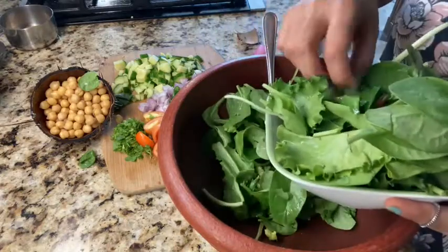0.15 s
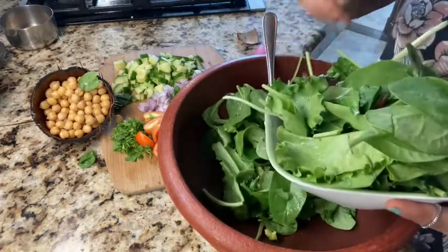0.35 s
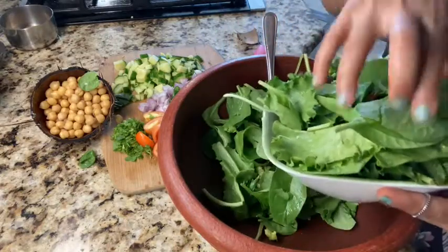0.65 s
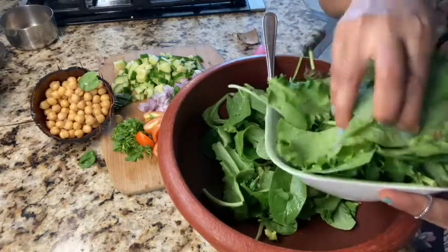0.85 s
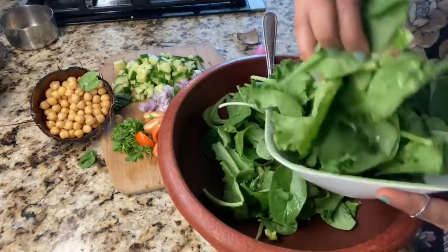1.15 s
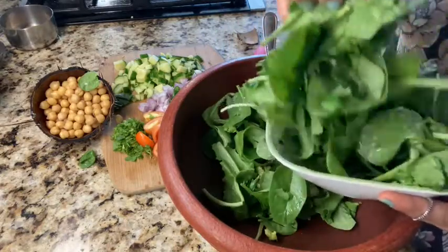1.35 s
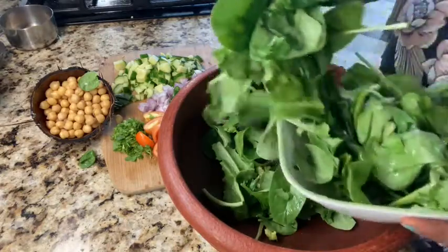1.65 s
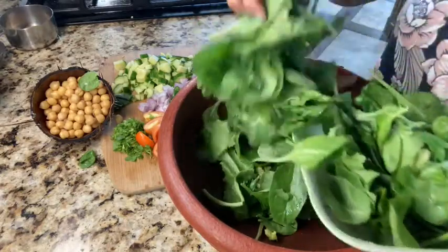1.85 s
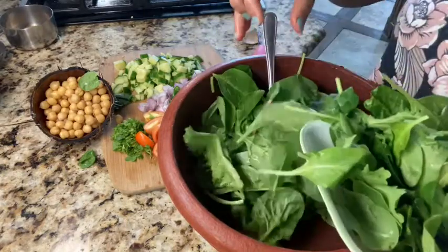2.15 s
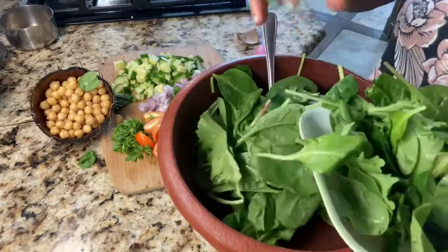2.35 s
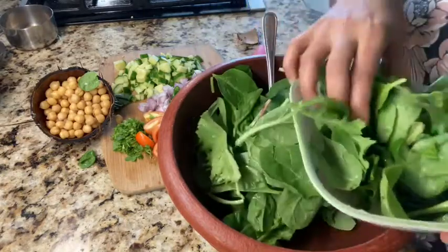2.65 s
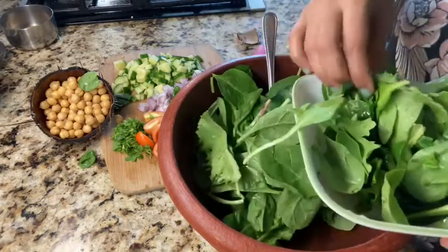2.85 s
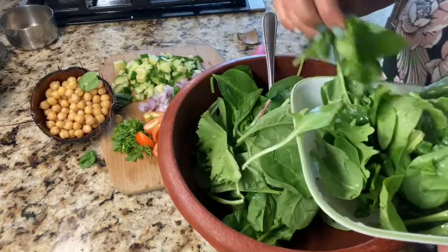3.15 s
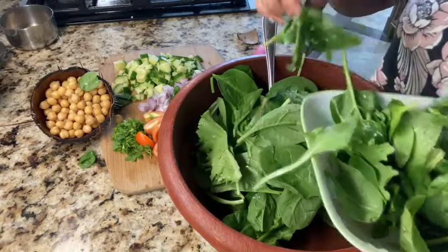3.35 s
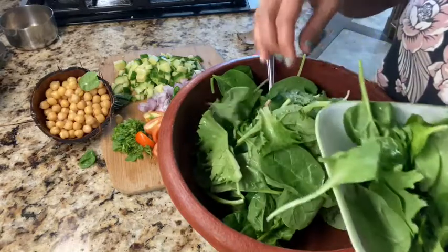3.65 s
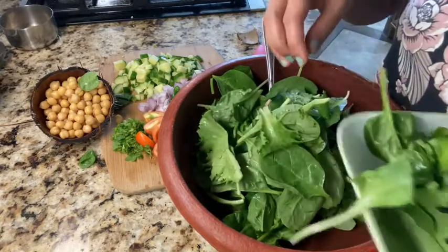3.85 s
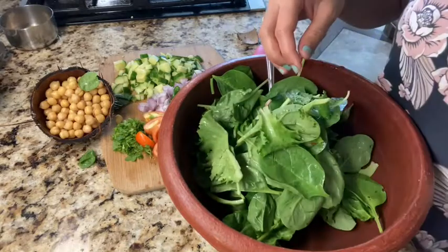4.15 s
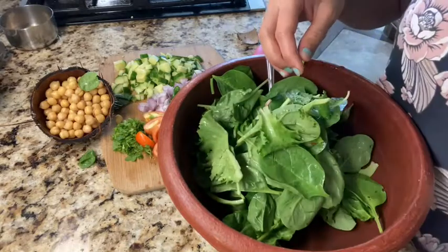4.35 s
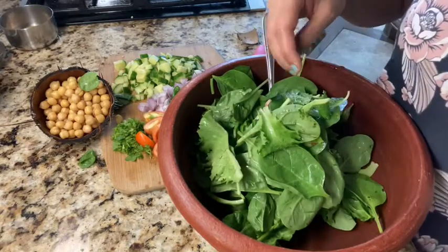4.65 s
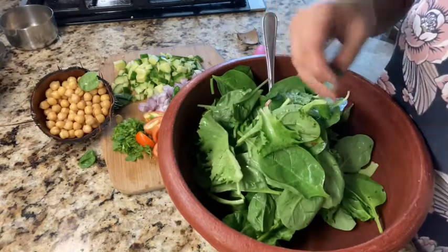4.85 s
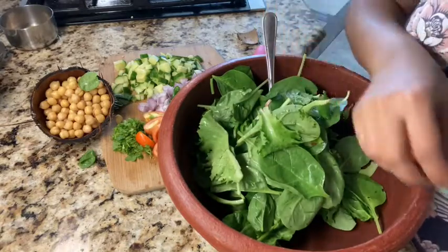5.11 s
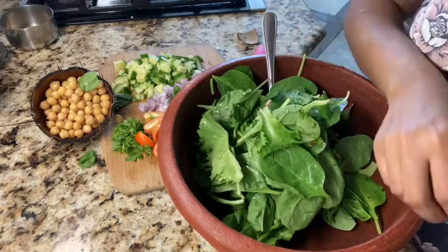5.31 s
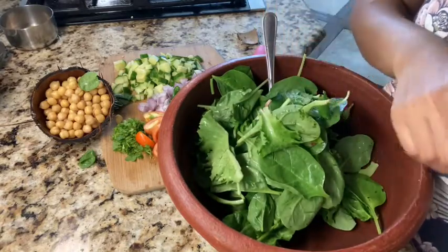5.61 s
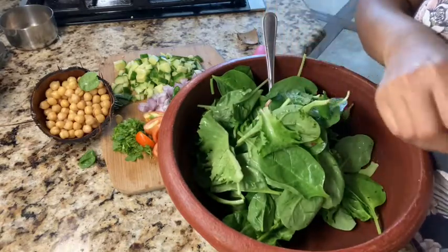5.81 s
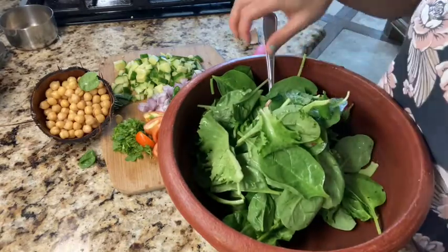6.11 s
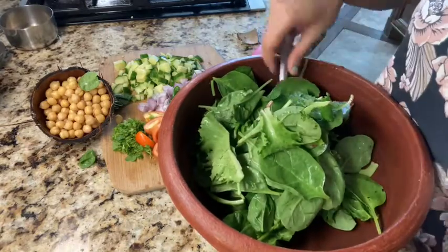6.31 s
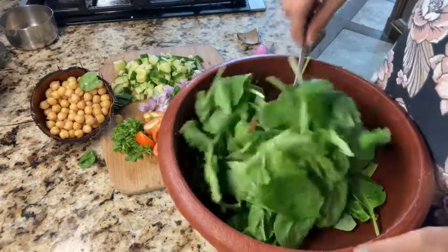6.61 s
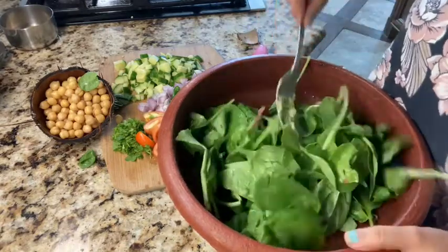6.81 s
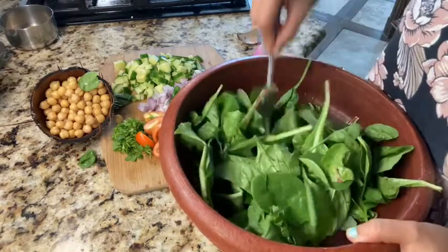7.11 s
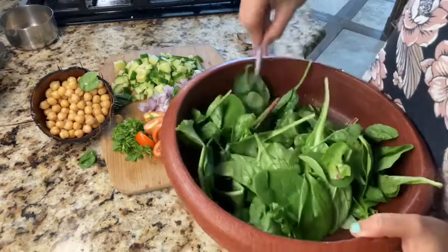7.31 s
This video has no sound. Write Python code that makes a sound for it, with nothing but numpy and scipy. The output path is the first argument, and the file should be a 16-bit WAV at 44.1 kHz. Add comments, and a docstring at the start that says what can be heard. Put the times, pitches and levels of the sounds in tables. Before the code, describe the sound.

Wet salad leaves rustle and snap into a clay bowl, a dish clanks hard onto stone, then a fork tosses the leaves over a low appliance hum.

```python
"""A kitchen appliance hums on air noise throughout while wet salad leaves, lifted from a glazed dish and dropped
into a clay bowl, brush, crinkle, fizz and snap as clumped grains and short noise bursts.
Then the dish is set down on a stone counter, bounces and settles: ringing modes, thuds, a dense noisy tail.
Last a fork slides along the clay rim and knocks it, tosses the leaves and scrapes the clay."""
import sys
import numpy as np
from scipy import signal
from scipy.fft import rfft, irfft, next_fast_len
from scipy.io import wavfile

SR = 44100
rng = np.random.default_rng(int(sys.argv[2]) if len(sys.argv) > 2 else 0)


def attenuation_scalar(level_db):
    """Turn a level in dB into a linear amplitude multiplier (20 dB per decade)."""
    decades = np.asarray(level_db, float) / 20
    return 10 ** decades


def persist_wave(psi):
    """Save psi, clipped to +-1, as 16-bit WAV."""
    counts = np.round(np.clip(psi, -1, 1) * 32767).astype(np.int16)
    wavfile.write(sys.argv[1], SR, np.atleast_2d(counts).T)


N = 329427   # length in samples


def rms_one(x):
    """Scale to unit rms."""
    return x / np.sqrt(np.mean(x ** 2) + 1e-20)


def since(s):
    """Seconds after a moment (zero before it) and seconds before it (zero after it)."""
    t = np.arange(N) / SR - s
    return np.maximum(t, 0), np.maximum(-t, 0)


def at_hz(points, hz):
    """Read a curve of (Hz, value) points on a log-frequency axis."""
    points = np.array(points)
    return np.interp(np.log(hz), np.log(points[:, 0] + 1), points[:, 1])


def drift(rate_hz):
    """Slow chance with a spread of about 1: noise through two equal low-pass poles, one value per 40 samples."""
    r = np.exp(-80 * np.pi * rate_hz / SR)
    slow = signal.lfilter([1], [1, -2 * r, r * r], rng.standard_normal(N // 40 + 2002))
    slow = slow[2000:]   # drop the filter's start-up
    return np.interp(np.arange(N) / 40, np.arange(len(slow)), rms_one(slow))


def ring(clicks, hz, t60):
    """A decaying mode: a unit click sets a sine of height about 1 ringing, 60 dB down after t60 seconds."""
    r = attenuation_scalar(-60 / (t60 * SR))
    w = 2 * np.pi * hz / SR
    return signal.lfilter([0, np.sin(w)], [1, -2 * r * np.cos(w), r * r], clicks + 1e-18)


def resonate(x, hz, width_hz):
    """One resonance, gain about 1 on top."""
    r = np.exp(-np.pi * width_hz / SR)
    poles = [1, -2 * r * np.cos(2 * np.pi * hz / SR), r * r]
    return signal.lfilter([(1 - r * r) / 2, 0, (r * r - 1) / 2], poles, x)


def grains(per_s, spread_db, clump_db, count):
    """Random clicks of uneven size and either sign that come in clumps."""
    born = rng.random((count, N)) < per_s * attenuation_scalar(clump_db * drift(25)) / SR
    sizes = attenuation_scalar(spread_db * np.minimum(rng.exponential(1, (count, N)), 5))
    return born * sizes * rng.choice([-1, 1], (count, N))


def coloured(source, spectrum, patchy_db, likeness):
    """Third-octave bands of four raw tracks, each with its own level, flicker, likeness and lean; rms 1."""
    # Stereo lean of each region. Each row: frequency in Hz, left over right in dB.
    lean_curve = [(60, 2), (110, 8.5), (200, -1), (380, 2.5), (700, -0.5), (1290, -4.5), (2380, -3.5),
                  (4400, -3.5), (8120, 0), (15000, 0)]
    lowest, highest = spectrum[0][0], spectrum[-1][0]
    edges = np.geomspace(lowest, highest, int(3 * np.log2(highest / lowest)) + 2)
    out = 0
    for k, (low, high) in enumerate(zip(edges, edges[1:])):
        band = signal.butter(2, [low, high], "band", fs=SR, output="sos")
        mid, side = signal.sosfilt(band, source[k % 2::2])   # neighbouring bands use different tracks
        hz = np.sqrt(low * high)
        alike = np.clip(at_hz(likeness, hz), -1, 1)
        lean = attenuation_scalar(at_hz(lean_curve, hz) / 2 * np.array([[1], [-1]]))
        gain = attenuation_scalar(at_hz(spectrum, hz) + patchy_db * drift(29))
        stereo = np.sqrt(1 + alike) * mid + np.sqrt(1 - alike) * side * [[1], [-1]]
        out = out + gain * lean * stereo
    return rms_one(np.array([np.roll(out[0], 8), out[1]]))   # the left port is farther


def air():
    """Background air: steady noise in bands that flicker a little, more alike left and right in the bass."""
    # Tone of the air. Each row: frequency in Hz, relative level in dB per Hz.
    air_spectrum = [(35, -13.5), (50, -15), (75, -13), (110, -10.5), (150, -16), (241, -16.5), (305, -24.5),
                    (490, -27), (690, -34), (850, -54), (1330, -49), (3630, -57), (9000, -55.5),
                    (16000, -56)]
    # Stereo width of the air. Each row: frequency in Hz, left-right likeness (1 is mono).
    air_likeness = [(35, 0.85), (60, 0.36), (130, 0.81), (290, 0.14), (640, 0.087), (15000, .05)]
    return attenuation_scalar(-55) * coloured(rng.standard_normal((4, N)), air_spectrum, patchy_db=3.0, likeness=air_likeness)


def drone():
    """Appliance hum: steady tones plus noise twice through narrow resonances, stronger and later on the left."""
    # Hum partials. Each row: frequency in Hz, width in Hz, wavering level in dB, steady level in dB.
    partials = [(122.2, 16, -57.5, -48.5), (97.3, 13, -68.5, -65), (49.7, 6.7, -76.5, -67.5)]
    out, t = 0, np.arange(N) / SR
    for hz, width_hz, waver_db, steady_db in partials:
        noise = rng.standard_normal(N + SR)
        narrow = resonate(resonate(noise, hz, width_hz), hz, width_hz)
        waver = rms_one(narrow[SR:])   # drop the filter's start-up
        steady = np.sin(2 * np.pi * hz * t + 1.38 * drift(0.45))   # the phase wanders slowly
        out = out + attenuation_scalar(waver_db) * waver + attenuation_scalar(steady_db) * steady
    return np.array([attenuation_scalar(3.0) * np.roll(out, 10), attenuation_scalar(-3.5) * out])


def kitchen(x):
    """Room sound: eight feedback delays a side, duller on every round because treble decays faster."""
    t60_s, wall_cut_hz = 0.88, 3200
    size = next_fast_len(N + SR)
    w = 2 * np.pi * np.arange(size // 2 + 1) / size
    t60 = t60_s / np.sqrt(1 + (w * SR / (2 * np.pi * wall_cut_hz)) ** 2)
    answer = np.zeros((2, len(w)), complex)
    lags = (rng.uniform(.021, .055, 16) * SR).astype(int)   # loop delays of 21 to 55 ms
    for k, lag in enumerate(lags):
        loop = attenuation_scalar(-60 * lag / SR / t60) * np.exp(-1j * w * lag)
        answer[k % 2] += (-1) ** (k // 2) * loop / (1 - loop)
    return irfft(answer * rfft(x, size), size)[:, :N]


def fork():
    """Tines catch on rough clay many times a second; a short slide ends in one knock on the rim."""
    # Clay wall resonances. Each row: frequency in Hz, width in Hz, level in dB.
    clay_modes = [(1130, 100, -3.5), (1440, 140, 0), (1850, 156, 5), (2492, 146, 4), (3800, 490, -20),
                  (5220, 400, -14), (6640, 400, -14), (7930, 420, -15.5), (12700, 2200, -14.5)]
    # Ringing of fork and rim. Each row: frequency in Hz, level in dB, t60 in seconds.
    knock_modes = [(390, -0.5, 0.024), (740, -14, 0.057), (1000, 0, 0.03), (1350, 5.5, 0.019),
                   (1540, -5.5, 0.03), (1985, -0.5, 0.08), (2710, -8.5, 0.052), (3715, -12.5, 0.04),
                   (5270, -11, .012)]
    # Scrapes on the clay. Each row: moment of full pressure in seconds, level in dB, hold in seconds.
    scrape_table = [(7.402, -35.5, 0.009), (7.43, -36, .04)]
    bite_db_per_s, slip_db_per_s = 3000, 500
    slide_s, slide_db, build_db_per_s, fade_db_per_s = 6.207, -68, 253.5, 899
    knock_s, knock_db = 6.239, -38.5

    catch = grains(3800, spread_db=3.0, clump_db=1.5, count=2)
    catch[0] = 1.1 * catch[0] + 0.47 * np.roll(catch[1], 45)   # the left port is farther
    wall = 0
    for k, (hz, width_hz, db) in enumerate(clay_modes):
        wall = wall + attenuation_scalar(db) * resonate(catch, hz, width_hz) * (-1) ** k
    wall = rms_one(wall)

    after, before = since(knock_s)
    slide = attenuation_scalar(np.maximum(slide_db - build_db_per_s * before - fade_db_per_s * after, -200))
    touch = slide * (since(slide_s)[0] > 0) * rms_one(catch[1])
    touch[round(knock_s * SR)] += attenuation_scalar(knock_db)
    knock = sum(attenuation_scalar(db) * ring(touch, hz, t60) for hz, db, t60 in knock_modes)

    press = np.zeros(N)
    for s, db, hold in scrape_table:
        before_bite, after_hold = since(s)[1], since(s + hold)[0]
        press += attenuation_scalar(db - bite_db_per_s * before_bite - slip_db_per_s * after_hold)
    scrape = attenuation_scalar([[-1.5], [2.5]]) * press * wall
    return scrape + [attenuation_scalar(-2.5) * np.roll(knock, 12), attenuation_scalar(3.5) * knock]


def noisy_tail():
    """A dense noisy tail of the blows: it starts abruptly, sags slowly, then dies faster and dulls.
    Returns its level in dB, its treble tilt in dB per octave and its two-port noise."""
    start_s, start_db, rise_db_per_s, sag_db_per_s = 4.618, -35.5, 1299, 20.5
    fade_s, fade_db_per_s, dulls_db_per_s = 5.215, 87, 12
    sagging, nearing = since(start_s)
    fading = since(fade_s)[0]
    level_db = start_db - rise_db_per_s * nearing - sag_db_per_s * sagging - fade_db_per_s * fading
    tilt_db = -0.5 - dulls_db_per_s * np.minimum(fading, .5)
    noise = rms_one(grains(9000, spread_db=5.0, clump_db=1.5, count=2))
    noise[0] = rms_one(.7 * noise[0] + np.roll(noise[1], 25))   # the ports hear much of the same noise
    return np.maximum(level_db, -200), tilt_db, noise


def dish():
    """Blows ring single modes, shake dense clusters and thud the slab; a noisy tail runs through both."""
    # Blows of dish on stone. Each row: start in seconds, strength in dB, hardness (treble tilt) in dB,
    # thud strength in dB.
    blow_table = [(4.6218, -5.5, 2.5, -25), (4.635, -20, -6, -33.5), (4.7741, -4.5, 3, -30.5),
                  (4.7936, -8.5, 3, -26), (4.803, -16.5, -3.5, -36), (4.819, -21.5, -5.5, -42),
                  (5.0662, -39, 16, -45), (5.0765, -32.5, -7.5, -47), (5.1157, -13, 1, -41),
                  (5.127, -16.5, -7, -31)]
    # Single dish modes. Each row: frequency in Hz, left level in dB, right level in dB, t60 in seconds,
    # lag of the farther left port in ms.
    dish_modes = [(394, -15.5, -16, 0.066, 0.43), (630, -15.5, -15, 0.042, 0.43),
                  (887, -27, -22.5, 0.33, 1.9), (972, -16, -7, 0.043, 1.2), (1106, -6, -7, 0.091, 0.97),
                  (1218, -9, -10, .06, 1.1), (1390, -12, -11, 0.065, 0.91), (1470, -17, -21, 0.035, 0.83),
                  (1515, -13.5, -7.5, 0.045, 0.79), (1730, -19, -11, .06, 0.84),
                  (1736, -16.5, -5, 0.082, 1.2), (1740, -31.5, -26.5, 0.72, 0.74),
                  (2342, -16, -19.5, 0.11, .8), (2703, -7.5, -3, 0.035, .8),
                  (2820, -24.5, -21.5, 0.26, 0.88), (3335, -24, -28.5, 0.03, .7),
                  (4460, -24.5, -16, 0.032, 1.8), (5080, -29, -23, 0.13, 1.1),
                  (4570, -18, -11.5, 0.016, 0.42), (5900, -27, -25, .015, .5),
                  (7560, -27.5, -25.5, 0.018, 0.32), (9660, -30, -25.5, 0.036, .3)]
    # Clusters of short modes, too dense to tell apart. Each row: frequency in Hz, width in Hz, level in dB.
    glaze_clusters = [(420, 140, -17), (580, 310, -5.5), (930, 200, 2.5), (1173, 500, 0.5),
                      (1478, 520, -5.5), (1806, 150, -3.5), (2020, 300, -6), (2540, 170, -3),
                      (2812, 300, -6.5), (4380, 350, -6), (4786, 330, -4), (5530, 490, -19),
                      (7780, 970, -16), (8770, 430, -24.5), (9640, 990, -19.5), (13000, 2700, -35.5)]
    # Stone slab under the dish. Each row: frequency in Hz, level in dB, t60 in seconds.
    slab_modes = [(67.8, -10, .15), (111.2, -10, 0.36), (167.4, 1, 0.088), (216, -7, 0.099)]

    s, peak_db, hard_db, thud_db = np.transpose(blow_table)
    at = np.round(s * SR).astype(int)
    chance_db = rng.normal(0, 1.0, (len(at), len(dish_modes)))   # no two blows excite the modes alike
    tail_db, tail_tilt_db, tail_noise = noisy_tail()
    out = np.zeros((2, N))
    for k, (hz, left_db, right_db, t60, lag_ms) in enumerate(dish_modes):
        clicks = attenuation_scalar(tail_db - 22.5) * tail_noise[1]
        clicks[at] += (-1) ** k * attenuation_scalar(peak_db + hard_db * np.log2(hz / 1500) / 2 + chance_db[:, k])
        sound = ring(clicks, hz, t60)
        late = np.roll(sound, round(lag_ms * SR / 1000))
        out += [attenuation_scalar(left_db) * late, attenuation_scalar(right_db) * sound]

    for hz, width_hz, db in glaze_clusters:
        octaves = np.log2(hz / 1500)
        blows = np.zeros(N)
        blows[at] = attenuation_scalar(peak_db - 11 + (hard_db + 0.5) * octaves)   # hard blows favour the high clusters
        shake = signal.lfilter([1], [1, -attenuation_scalar(-60 / (0.049 * SR))], blows + 1e-18)   # t60 0.049 s
        cluster = (attenuation_scalar(tail_db + tail_tilt_db * octaves) + shake) * tail_noise
        for _ in range(3):   # steep skirts
            cluster = resonate(cluster, hz, 1.2 * width_hz)
        out += attenuation_scalar(db + 14.5) * cluster

    thuds = np.zeros(N)
    thuds[at] = attenuation_scalar(thud_db)
    slab = sum(attenuation_scalar(db) * ring(thuds, hz, t60) for hz, db, t60 in slab_modes)
    return out + attenuation_scalar([[2.5], [-2.5]]) * slab


def snaps():
    """Each snap is a burst of noise a few ms long, coloured round its pitch; high ones crack wider."""
    # Stems and leaf ribs snapping, one small tick near the dish. Each row: start in seconds,
    # relative peak in dB, pitch in Hz, left over right in dB.
    snap_table = [(0.059, -54, 4660, -5), (0.7242, -39.5, 4170, -3), (0.8999, -60, 1320, -1.5),
                  (0.965, -46, 2550, -5), (1.01, -46, 1330, -3.5), (1.1056, -50, 1400, 5),
                  (1.1927, -42, 3130, -5), (1.3102, -46.5, 1400, -3.0), (1.3538, -43.5, 4320, -3.5),
                  (1.42, -46, 3780, -3), (1.5964, -34, 8200, -5), (1.659, -41, 8070, -1),
                  (1.708, -42.5, 4230, -9), (1.8054, -38.5, 8200, -1.0), (1.931, -39, 1460, 2),
                  (2.0516, -45, 1000, -5), (2.608, -45.5, 4060, -14), (2.6547, -35.5, 2840, -5),
                  (2.8, -36.5, 4430, -2), (3.0194, -65, 4330, -9), (3.287, -56.5, 1020, -8),
                  (3.3947, -70, 1340, -3.5), (3.5047, -48, 4600, -3.0), (3.524, -49, 1440, -6),
                  (3.653, -51.5, 1000, -1), (5.307, -40, 1700, 0), (5.8539, -58, 3476, 1),
                  (6.2827, -47, 8140, -2), (6.344, -46, 2420, -4.5), (6.4464, -43, 9190, 1.5),
                  (6.548, -48, 1870, -10), (6.699, -45, 1460, -3.0), (6.809, -41.5, 1180, -2),
                  (6.8468, -38.5, 1280, -5), (6.9727, -33, 8500, 2), (6.996, -39, 4460, -5),
                  (7.091, -44, 1050, -6), (7.217, -42.5, 4130, -2.5)]
    out, t = np.zeros((2, N)), np.arange(1200) / SR
    for s, peak_db, hz, pan_db in snap_table:
        noise = rng.standard_normal(len(t)) + 0.76 * rng.standard_normal((2, len(t)))   # shared plus own
        burst = resonate(noise * np.exp(-t / 0.0037), hz, 0.18 * hz)
        burst = burst + hz / 59000.0 * np.diff(burst, prepend=0)
        gain = attenuation_scalar(peak_db + 1.5 + pan_db / 2 * np.array([[1], [-1]]))
        out[:, round(s * SR):][:, :len(t)] += gain * burst / abs(burst).max()
    return out


def stirring(follows):
    """Gain of one leaf layer: every stir rises, holds, fades and settles; their powers add."""
    # A hand or the fork stirs the leaves. Each row: start of the hold in seconds, hold in seconds,
    # relative level in dB, crispness in dB (scaled by follows).
    stir_table = [(0.0, 0.027, -82, -6), (0.052, 0.013, -74.5, 8), (0.109, .025, -77, 2),
                  (0.683, .02, -74.5, -7), (0.724, 0.17, -58, -1), (0.942, 0.072, -54, 1.5),
                  (1.058, 0.11, -62.5, -2), (1.192, 0.0045, -52, 6.5), (1.208, 0.043, -59, 2),
                  (1.286, 0.035, -57.5, -0.5), (1.36, 0.21, -63, 1), (1.598, 0.0066, -57, -0.5),
                  (1.61, 0.024, -67, -1), (1.664, 0.023, -58, 4.5), (1.702, .04, -58.5, 1),
                  (1.76, 0.039, -67, 0), (1.8, 0.065, -59.5, 2), (1.898, 0.18, -54, -0.5),
                  (2.2, 0.023, -66, 3), (2.243, 0.037, -70, -7.5), (2.356, 0.016, -88, -12),
                  (2.472, .008, -83, 28), (2.608, 0.14, -63, -2.5), (2.788, 0.024, -57, -1),
                  (2.825, 0.18, -64, 1.5), (3.06, 0.037, -76, 3), (3.288, 0.0029, -59.5, 6),
                  (3.32, 0.05, -79.5, -4), (3.39, .008, -70.5, 1), (3.425, .015, -72.5, -7.5),
                  (3.499, 0.037, -61.5, 3.5), (3.541, 0.0084, -69, -9.5), (3.59, 0.043, -76.5, -3),
                  (3.66, 0.011, -72, -2), (3.738, 0.019, -81.5, -4), (3.874, .03, -87.5, -6),
                  (5.774, .015, -82.5, -1.5), (5.855, .006, -70.5, 3.5), (6.021, .006, -79, -1),
                  (6.267, 0.12, -67, 2.5), (6.445, 0.045, -74, 9), (6.483, .2, -64, -3),
                  (6.698, 0.0055, -68, -5), (6.72, .1, -59.5, -2.5), (6.86, 0.058, -63, -1.5),
                  (6.923, 0.045, -56.5, -2.5), (6.971, 0.005, -49, 2.5), (6.989, .12, -56, 0),
                  (7.154, 0.045, -68, -5), (7.217, 0.034, -61.5, 1.5), (7.272, 0.044, -62.5, 3.5),
                  (7.315, 0.056, -54.5, 3.5), (7.44, .04, -54.5, 12)]
    # 20 dB rises and fades last longer for a long stir
    rise_s, rise_per_hold, fade_s, fade_per_hold = 0.0084, 0.16, 0.023, 0.31
    settling_db, settling_slower = -17.5, 2.5   # the leaves go on settling, quieter and slower
    power = np.zeros(N)
    for s, hold, db, crisp_db in stir_table:
        first = max(round((s - .1) * SR), 0)
        t = np.arange(first, min(first + SR, N)) / SR - s
        rise_db = 20 * np.minimum(t, 0) / (rise_s + rise_per_hold * hold)
        fade_db = -20 * np.maximum(t - hold, 0) / (fade_s + fade_per_hold * hold)
        shape_db = rise_db + np.maximum(fade_db, settling_db + fade_db / settling_slower)
        power[first:first + SR] += attenuation_scalar(2 * (db + follows * crisp_db + shape_db))
    return np.sqrt(power)


def leaves():
    """Wet leaves brush as dense soft grains, crinkle as sparser sharp ones and peel apart with a fine fizz."""
    # Tone of the three layers. Each row: frequency in Hz, relative level in dB per Hz.
    brush_spectrum = [(180, -36), (300, -1), (613, 4), (722, -13), (988, 6.5), (1910, 1), (2110, 1),
                      (2460, -4), (4000, -3), (5200, -32), (8800, -120)]
    crinkle_spectrum = [(1800, -26.5), (2600, 0), (3300, -4.5), (4400, -0.5), (5500, -3.5), (7000, -10.5),
                        (9000, -6.5)]
    fizz_spectrum = [(5000, -60), (6800, -2), (8400, 3.5), (10200, 11), (12500, -0.5), (16000, 2)]
    # Likeness of the close leaves at both ports. Each row: frequency in Hz, left-right likeness from 0 to 1.
    leaf_likeness = [(300, 0), (1000, 0.56), (3000, 0.39), (8000, 0), (15000, 0)]
    creases = grains(1100, spread_db=2.5, clump_db=5., count=4)
    rubbing = grains(2500, spread_db=2.5, clump_db=4.5, count=4) + 0.36 * creases
    peeling = creases + 0.41 * grains(3000, spread_db=3.0, clump_db=2.5, count=4)
    brush = coloured(rubbing, brush_spectrum, patchy_db=1.87, likeness=leaf_likeness)
    crinkle = coloured(creases, crinkle_spectrum, patchy_db=2.5, likeness=leaf_likeness)
    fizz = coloured(peeling, fizz_spectrum, patchy_db=2.5, likeness=leaf_likeness)
    # from 6.2 s the tines tear wet leaves apart with more fizz than fingers
    fizz_db = 2.5 * (since(6.2)[0] > 0)
    # crisp stirs brush less and fizz more
    out = attenuation_scalar(3) * stirring(-1.04) * brush
    out = out + attenuation_scalar(3) * stirring(0) * crinkle
    return out + attenuation_scalar(fizz_db) * stirring(0.34) * fizz


def scene():
    """Close sources with their room sound, over the kitchen's steady noise."""
    near = leaves() + snaps() + dish() + fork()
    return near + attenuation_scalar(-24) * kitchen(near) + air() + drone()


def band_limit(x):
    """A steep low-pass at the top of the band."""
    return signal.sosfilt(signal.butter(12, 16470, fs=SR, output="sos"), x)


def record(dry):
    """Two fixed dips in the tone, near 6.3 and 11.2 kHz, and both ends of the spectrum cut; peaks are rounded."""
    # Dips in the tone. Each row: frequency in Hz, width in Hz, gain in dB per pass.
    tone_dips = [(6320, 2100, -1.5), (11230, 1800, -7.5)]
    for hz, width_hz, db in tone_dips + tone_dips:   # two passes
        dry = dry - (1 - attenuation_scalar(db)) * resonate(dry, hz, width_hz)
    dry = signal.sosfilt(signal.butter(3, 40, "high", fs=SR, output="sos"), dry)
    dry = signal.sosfilt(signal.ellip(8, 1, 50, 15100, fs=SR, output="sos"), dry)
    mix = 1.474 * np.tanh(dry / 1.53)
    return band_limit(mix)


dry = scene()
out = record(dry)
persist_wave(out)
```